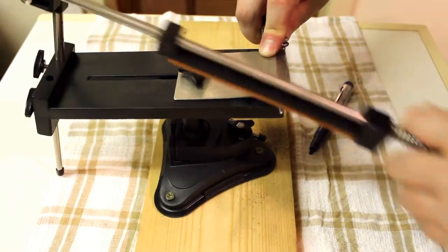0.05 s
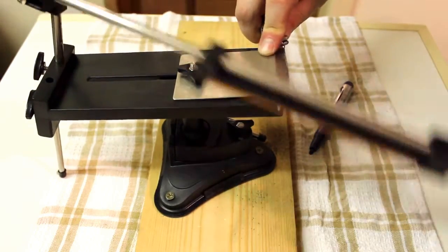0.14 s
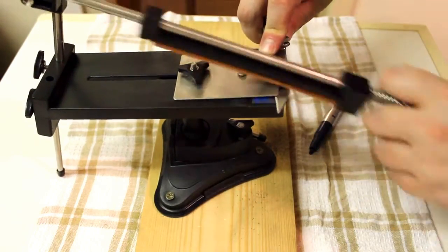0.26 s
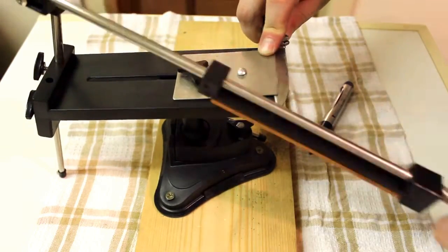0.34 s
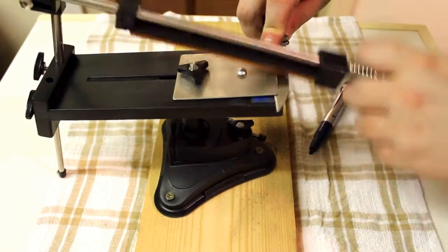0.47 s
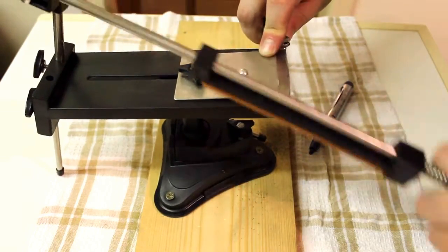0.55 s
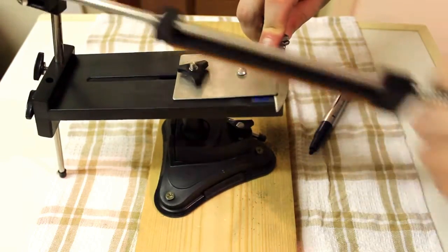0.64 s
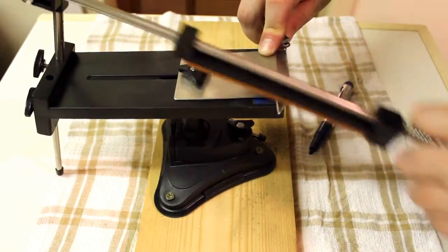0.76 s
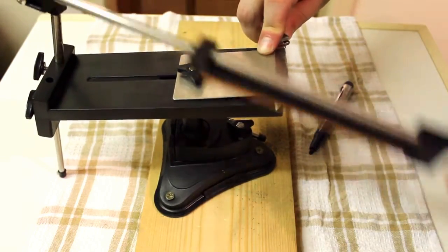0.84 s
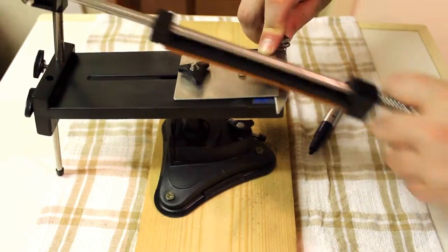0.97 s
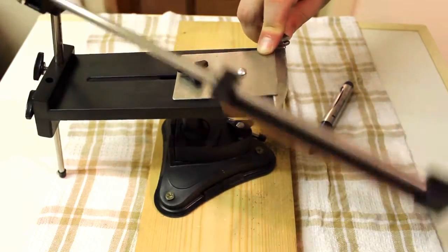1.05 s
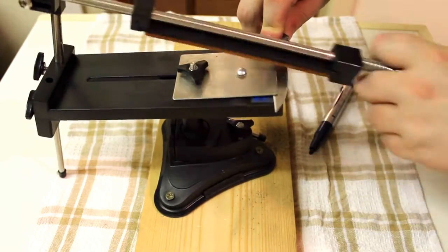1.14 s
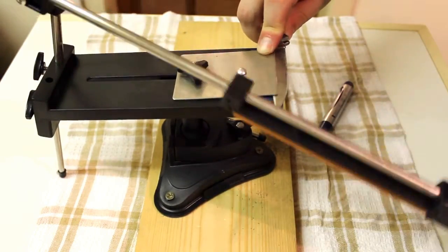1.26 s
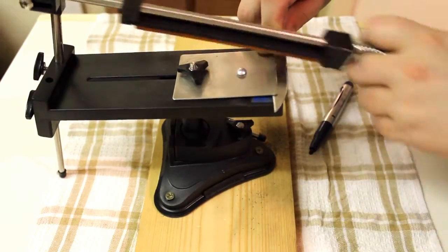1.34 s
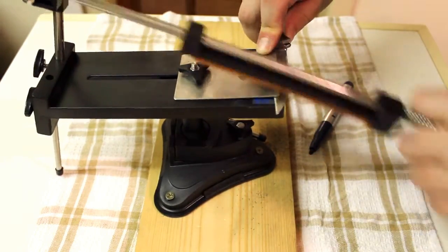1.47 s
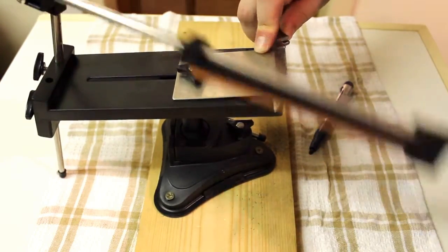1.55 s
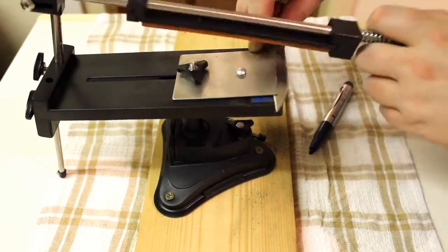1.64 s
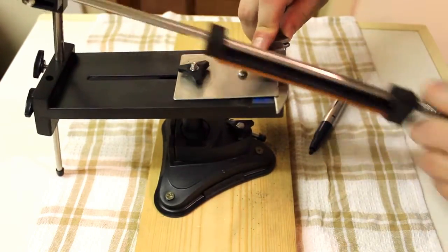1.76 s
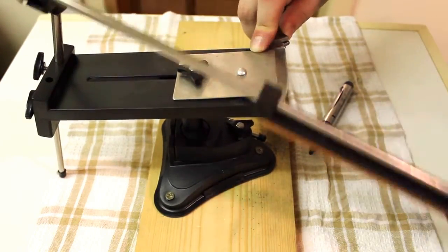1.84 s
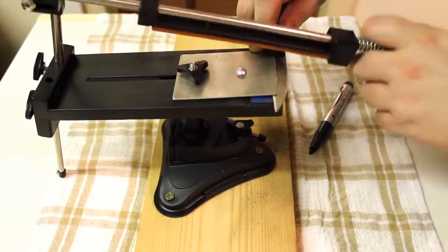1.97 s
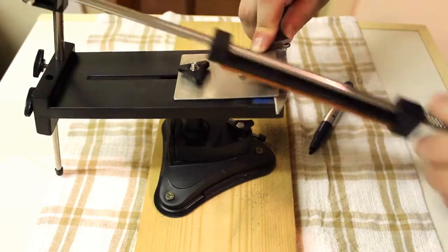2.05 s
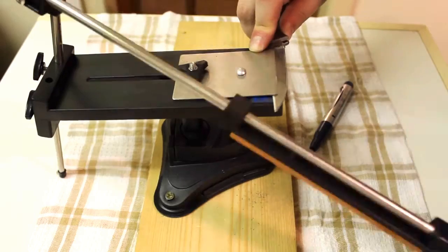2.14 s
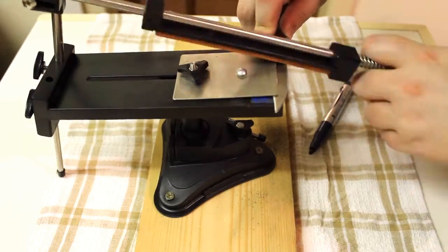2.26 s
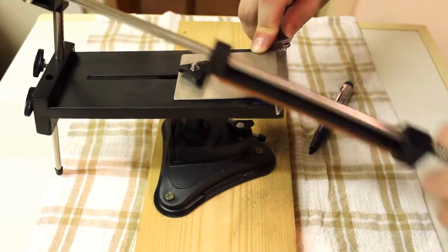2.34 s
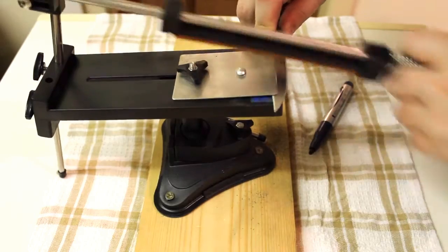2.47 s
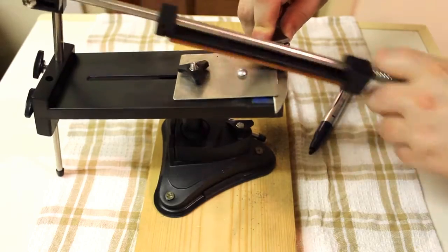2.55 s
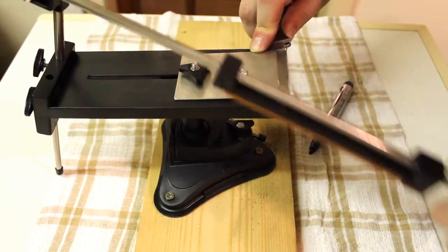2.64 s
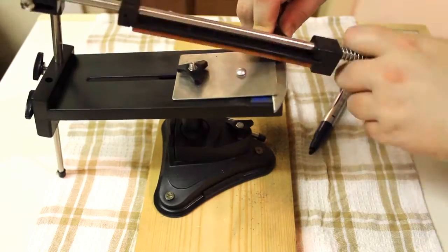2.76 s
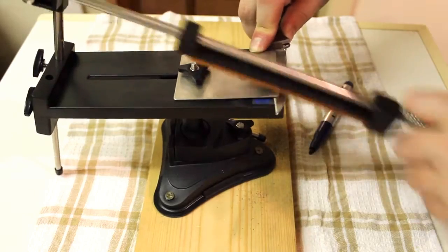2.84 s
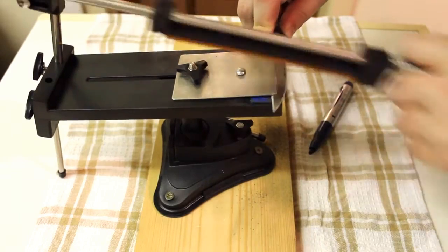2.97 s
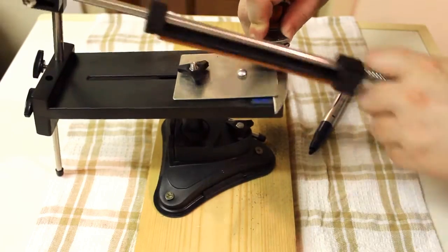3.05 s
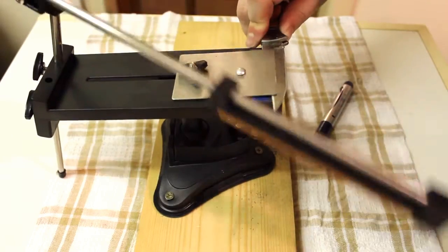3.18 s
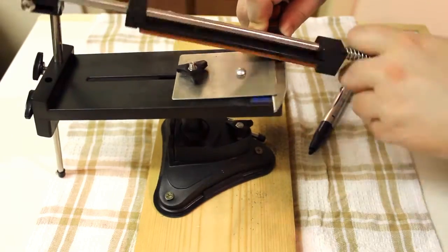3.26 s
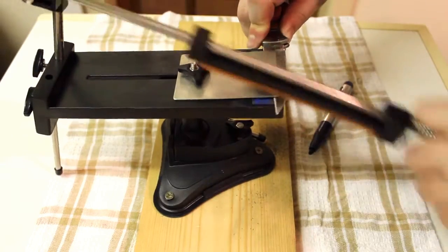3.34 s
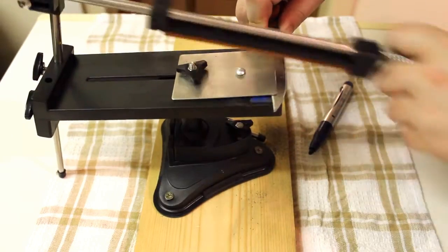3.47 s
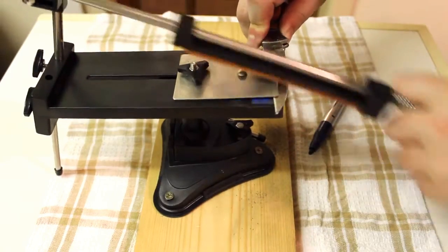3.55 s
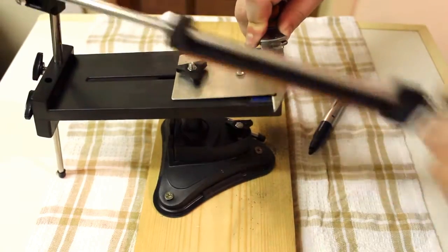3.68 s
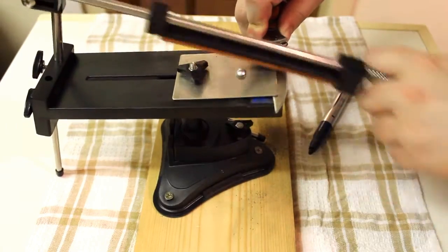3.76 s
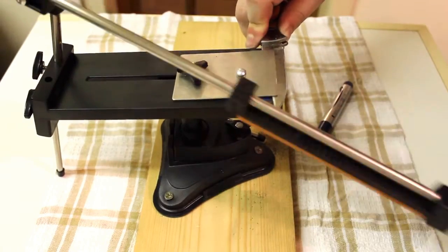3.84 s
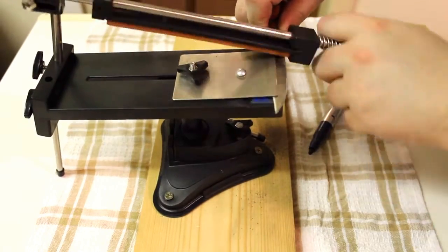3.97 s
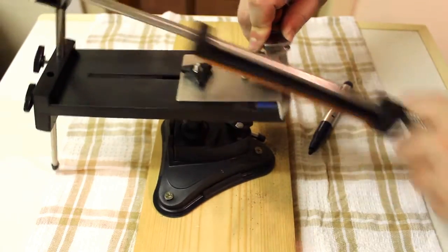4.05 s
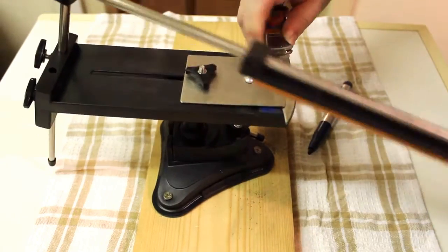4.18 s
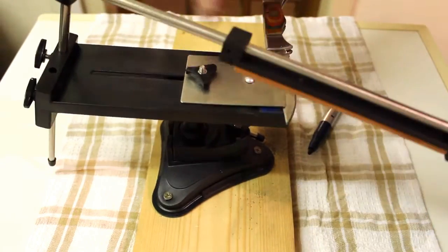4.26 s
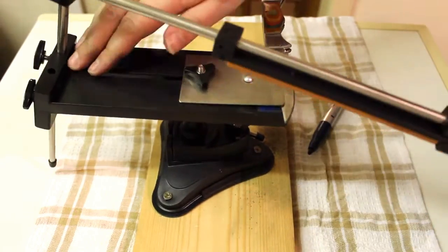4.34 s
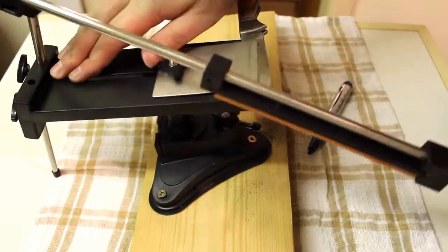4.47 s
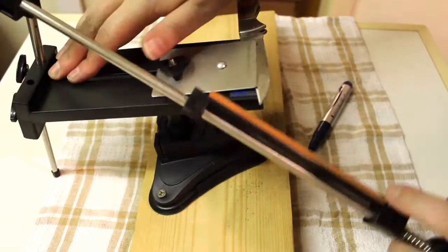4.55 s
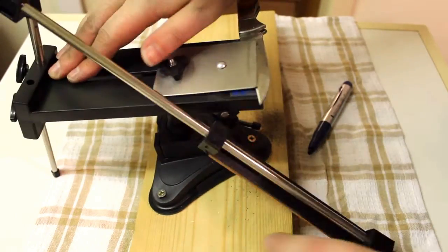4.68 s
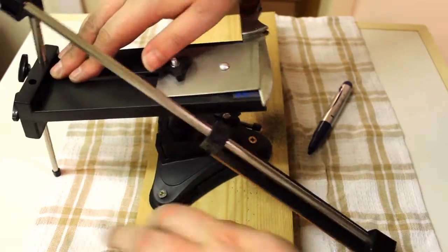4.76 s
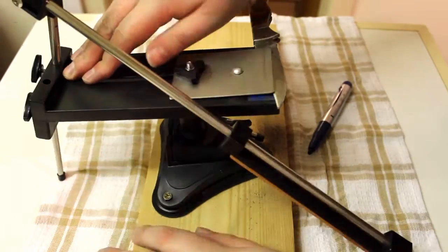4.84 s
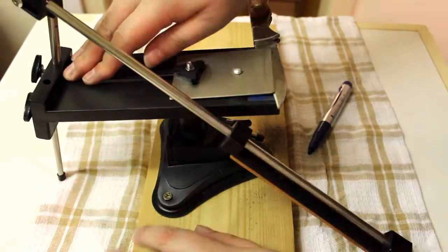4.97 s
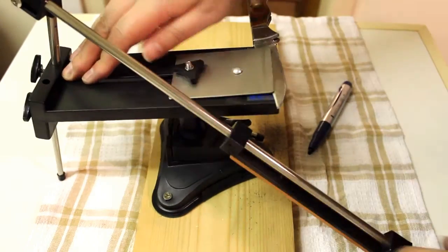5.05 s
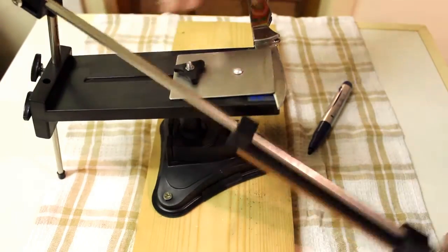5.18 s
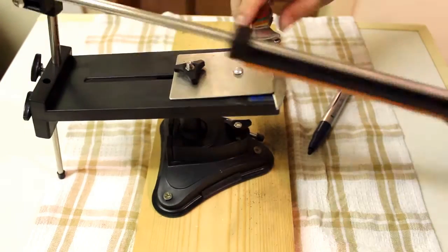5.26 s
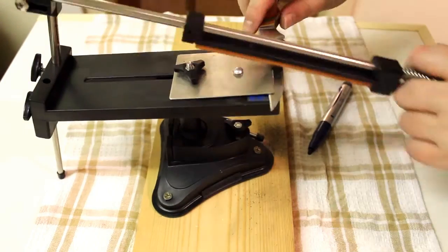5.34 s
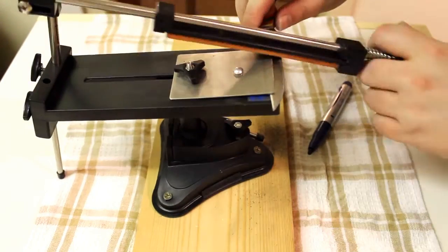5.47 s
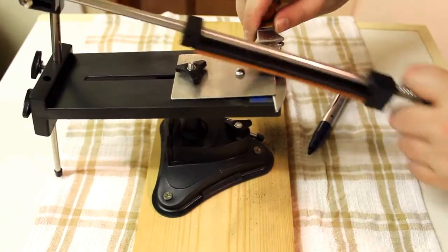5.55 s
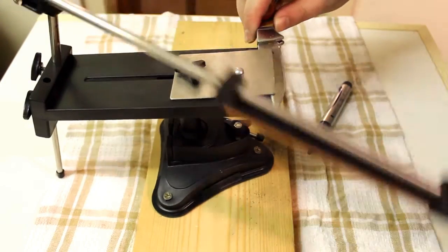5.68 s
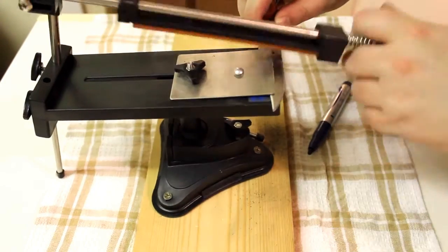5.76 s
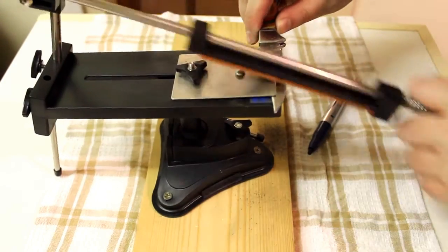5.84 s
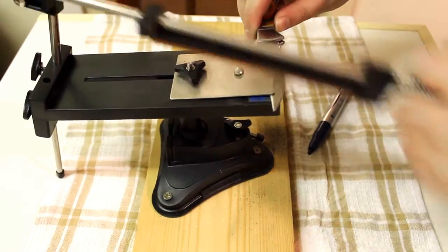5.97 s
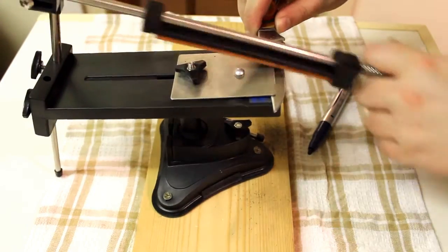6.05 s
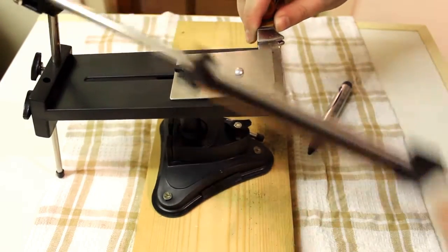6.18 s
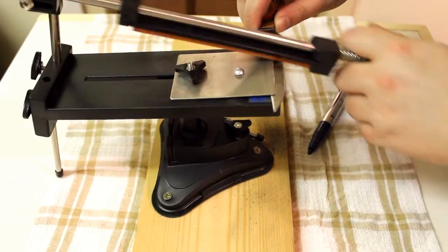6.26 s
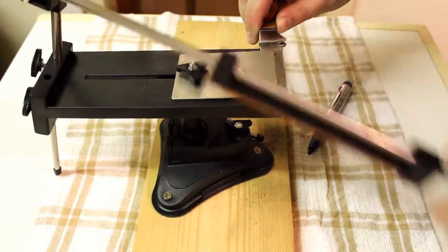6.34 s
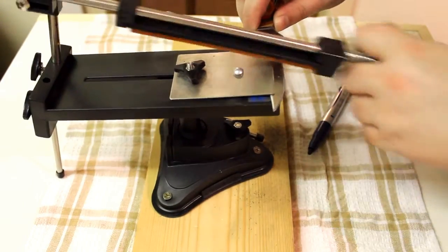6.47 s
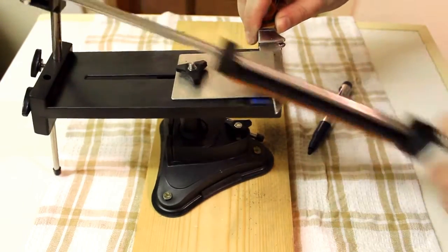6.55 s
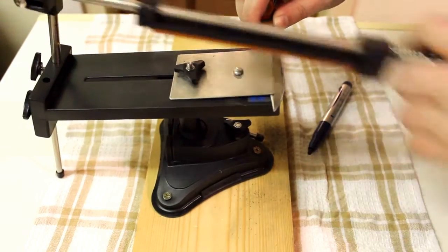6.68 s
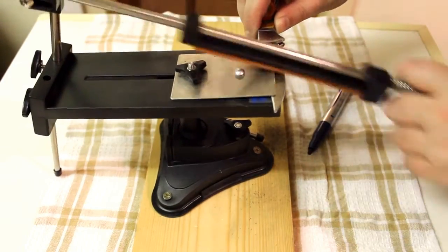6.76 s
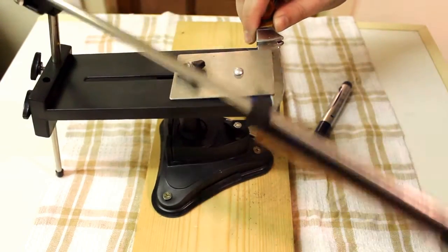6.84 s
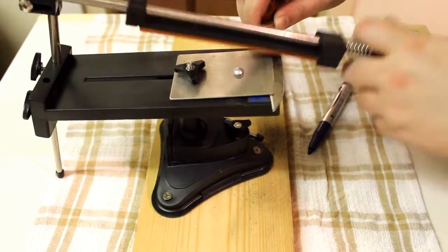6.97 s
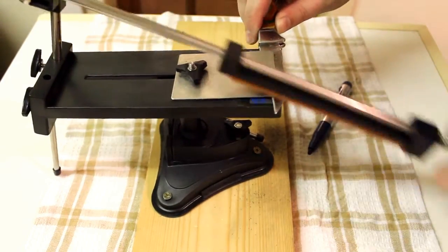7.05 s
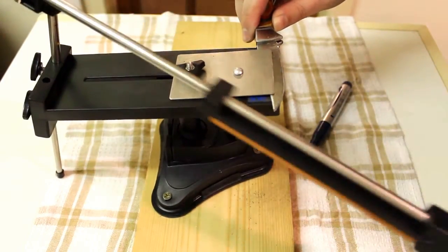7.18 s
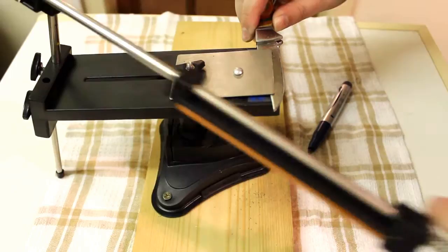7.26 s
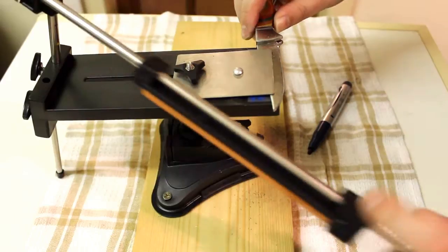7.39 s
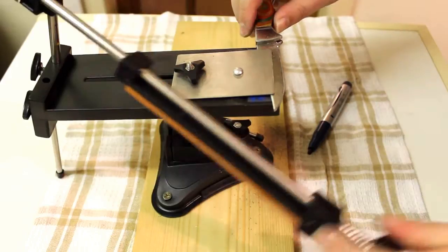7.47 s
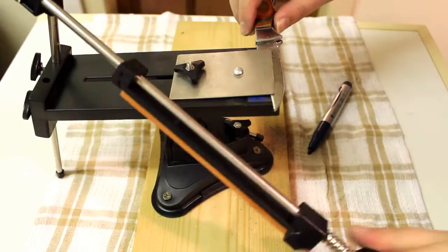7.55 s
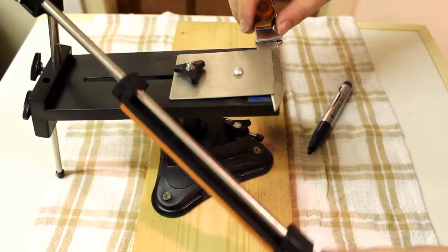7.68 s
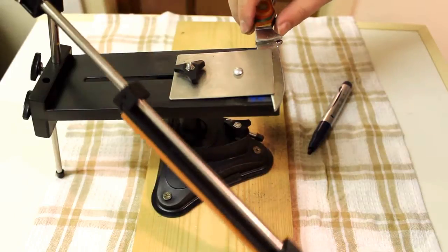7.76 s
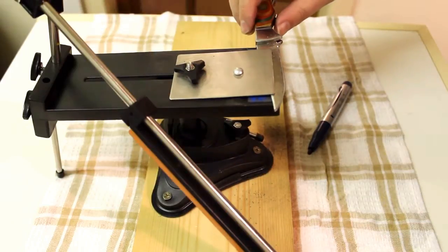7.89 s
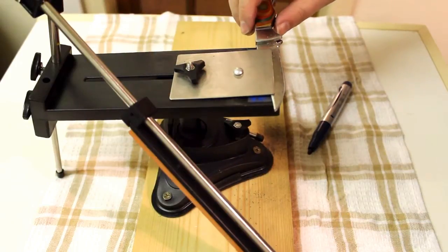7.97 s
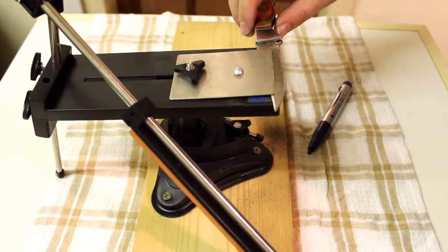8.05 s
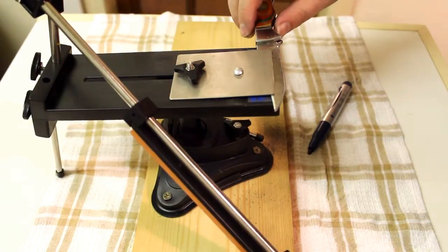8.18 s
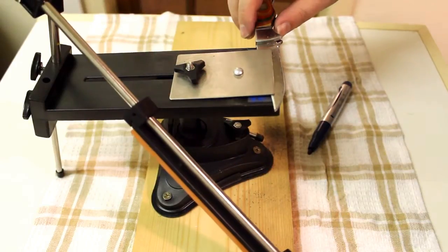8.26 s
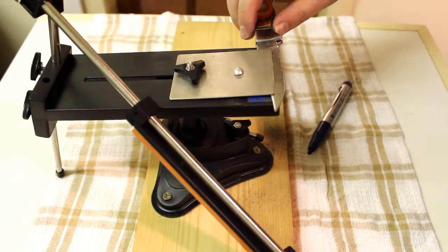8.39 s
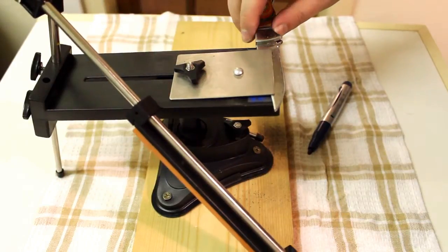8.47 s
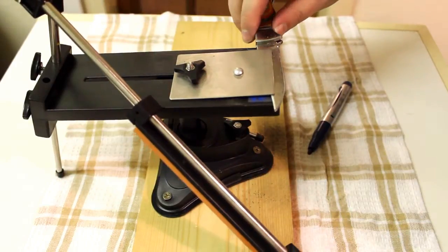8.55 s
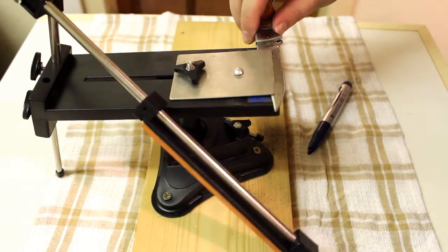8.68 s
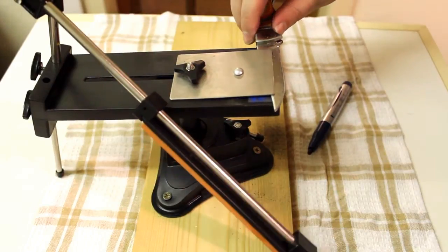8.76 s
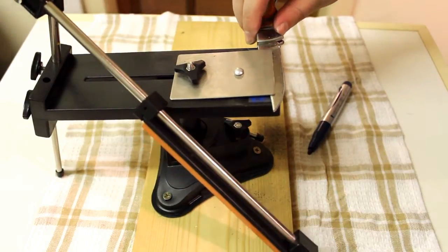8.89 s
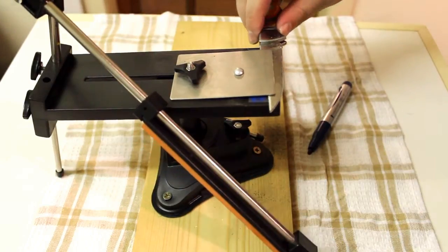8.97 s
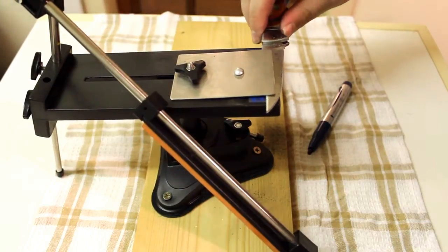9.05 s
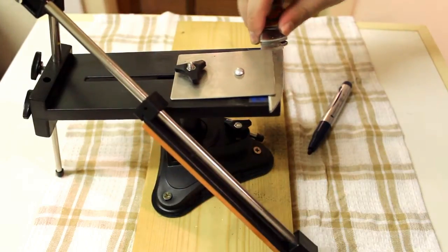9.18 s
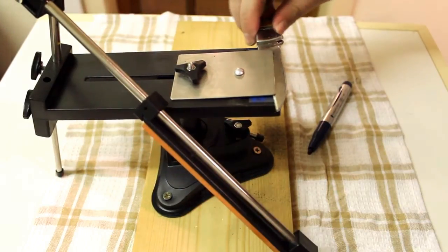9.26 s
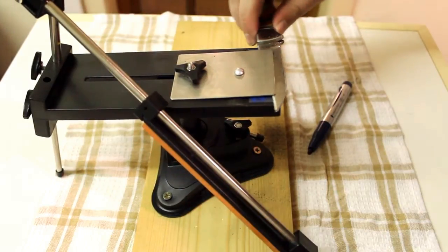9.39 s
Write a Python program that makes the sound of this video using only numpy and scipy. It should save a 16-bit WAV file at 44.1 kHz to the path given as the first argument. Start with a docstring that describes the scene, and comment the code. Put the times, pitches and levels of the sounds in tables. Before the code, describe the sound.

Fast, gritty stone scraping on a knife edge with sharp metallic clacks at each turn, then a sliding rod and small bumps over faint hum.

```python
"""Knife sharpening on a guided rod

A coarse stone scrapes along a clamped knife (grain noise under stroke envelopes) in a small room with a faint hum.
The loose holder knocks on its rod at each turn (coloured bursts, ringing modes); once the arm is laid down with a
clunk. Time runs four times fast for seven seconds, so all is high and quick; then, at natural speed, the rod
slides out in a fading rub and small things bump, rustle, tap and tick."""
import sys
import numpy as np
from scipy import signal
from scipy.fft import rfft, irfft
from scipy.io import wavfile

SR = 44100
rng = np.random.default_rng(int(sys.argv[2]) if len(sys.argv) > 2 else 0)


def to_wav(sig):
    """Store sig (one row per channel, or 1-D mono) as 16-bit WAV at the path in sys.argv[1].

    Samples outside -1..1 are clipped; the rate is SR.
    """
    pcm = np.clip(np.atleast_2d(sig), -1, 1) * 32767
    pcm = np.round(pcm).astype(np.int16)
    wavfile.write(sys.argv[1], SR, pcm.T)  # frames by channels


N = 415418
TIME_S = np.arange(N) / SR

# pushes, re a usual push: t/s, pressure/dB, clack/dB, clink/dB, clack-to-clink delay/s, bite/dB
PUSHES = [(0.0812, 1.5, 3, -1.5, 0.0044, -1), (0.3233, -6.5, 5, -9, 0.0022, -10),
          (.555, -11, 1.5, -5, 0.0045, -10), (0.7893, -9, 4, -9, 0.0043, -3),
          (1.0068, -6, 3.5, -6, 0.0038, -4.5), (1.2354, 1, 3.5, -2, 0.0039, 1.5),
          (1.471, -2, 0.5, 1.5, 0.00081, -4), (1.7582, -6.5, 1, -1.5, 0.0049, -8),
          (2.0731, -6.5, 1, 3, 0.001, -3), (2.3308, -0.5, -0.5, 1, 0.0049, -15),
          (2.584, -6.5, -7, -1, 0.00057, -3), (2.8512, -2.5, -1, -1, 0.0052, -1.5),
          (3.0912, -8, 0, -1, 0.004, -7), (3.3393, -6, 0.5, -1.5, 0.0049, -5),
          (3.5818, 0, 0.5, 0, 0.0043, -1), (3.818, 1, 1, -1, 0.0032, -2),
          (4.049, -0.5, -2.5, -7, 0.018, -3), (5.576, -21, -9.5, -8.5, 0.0069, -7.5),
          (5.87, -19, 0, 2, 0.0034, -1), (6.1067, -10, 1.5, 0, 0.0045, -5),
          (6.3325, -7, -3, -2.5, 0.0067, -5), (6.555, -0.5, -1, -12, 0.0019, 1.5),
          (6.8121, -10, -0.5, 0.5, 0.0064, -10), (7.0582, -7.5, -1.5, 0.5, 0.0045, 1)]
# pulls back, re a usual pull: t/s, pressure/dB, clack/dB, clink/dB, clack-to-clink delay/s
PULLS = [(0.1857, -2, -7, 0, 0.001), (0.429, 6, -5.5, -5, 0.0016), (0.6677, -1, -5, 0.5, 0.00092),
         (0.8946, -9, -6, 0.5, 0.001), (1.114, 1, 9, 1, 0.0021), (1.3381, 2, -14, 0, 0.0012),
         (1.5938, 3, 1.5, -0.5, 0.003), (1.9343, 5, -8, 1, 0.0014), (2.2041, 1, 2.5, 1.5, 0.00092),
         (2.4669, -6, 3.5, -0.5, 0.0038), (2.74, 2, -6, 1, 0.00091), (2.9785, 0, 2, -3.5, 0.0011),
         (3.2348, -14, -4.5, -0.5, 0.00073), (3.467, 2, -12, -3, .001), (3.701, 3, 0, 5, 0.0019),
         (3.93, 7, 0, -4.5, 0.00087), (4.1696, -24, 0, 2, 0.00091), (5.471, -7, -5.5, -6.5, 0.011),
         (5.7361, 7, 1, 0, 0.0022), (5.9879, 4, -17, 1, .001), (6.226, 2, 1.5, -2.5, 0.002),
         (6.4496, 13, -1, -6.5, 0.0016), (6.679, 9, -30, -1.5, 0.00095), (6.9331, 2, -5.5, 1, 0.00088),
         (7.1859, -11, -4.5, 3.5, 0.0014)]
# modes of rod, holder and blade: f/Hz, relative level/dB, t60/s
ROD = [(715, -11, .04), (915, -8, .04), (1050, -5, .022), (1310, -9, .028), (1500, -12, .025),
       (2130, -9, .02), (2800, -5, .015), (3030, -3, .016), (3460, 2.5, .016), (4020, -1.5, .014),
       (4700, -3, .014), (5080, -2, .016), (8690, 0, .01), (10850, -4, .01)]
# modes of the holder's spring: f/Hz, relative level/dB, t60/s
SPRING = [(2050, 0, .15), (2770, -1, .06), (3480, 0, .06), (5850, -2, .05)]


def amp(db):
    """Amplitude ratio of a level in dB."""
    return 10 ** (np.asarray(db) / 20)


def unit_rms(x):
    """Scales to an RMS of one."""
    return x / np.sqrt(np.mean(x ** 2) + 1e-20)


def unit_energy(x):
    """Scales to an energy of one."""
    return x / np.sqrt(np.sum(x ** 2) + 1e-20)


def add(mix, start_s, sound):
    """Adds a sound in place, cut at the end of the mix."""
    part = mix[round(start_s * SR):][:len(sound)]
    part += sound[:len(part)]


def convolve(x, response):
    """Causal filtering without the tail."""
    return signal.oaconvolve(x, response)[:len(x)]


def read_curve(points, hz):
    """Interpolates a curve over log frequency."""
    f, value = np.transpose(points)
    return np.interp(np.log(hz + 1), np.log(f + 1), value)


def three_bands(hz):
    """Gains of a low, a middle and a high band whose powers sum to one."""
    low = 1 / (1 + (hz / 2200) ** 10)
    high = 1 - 1 / (1 + (hz / 6400) ** 10)
    return np.sqrt([low, abs(1 - low - high), high])


def colour(points, band=None, size=2048):
    """Minimum-phase, unit-energy response with the given spectrum, or with one band of it."""
    hz = np.fft.rfftfreq(size, 1 / SR)
    gain = amp(read_curve(points, hz))
    if band is not None:
        gain = gain * three_bands(hz)[band]
    cepstrum = irfft(np.log(gain + 1e-4 * gain.max()))
    # folding the cepstrum makes the response causal
    cepstrum[1:size // 2] *= 2
    cepstrum[size // 2 + 1:] = 0
    return unit_energy(irfft(np.exp(rfft(cepstrum)))[:size // 2])


def drift(rate_hz):
    """Slow unit-RMS noise under a Gaussian low-pass."""
    hz = np.fft.rfftfreq(N, 1 / SR)
    spectrum = rfft(rng.standard_normal(N)) * np.exp(-(hz / rate_hz) ** 2)
    return unit_rms(irfft(spectrum, N))


def ring(modes, size=11025):
    """Dying sines of a struck part, which radiates little bass."""
    t = np.arange(size) / SR
    sines = np.zeros(size)
    for hz, db, t60_s in modes:
        sines += amp(db - 60 * t / t60_s) * np.sin(2 * np.pi * hz * t)
    high_pass = signal.butter(2, 300, "high", fs=SR, output="sos")
    return unit_energy(signal.sosfilt(high_pass, sines))


def ringing(x, modes, ring_db):
    """A sound together with the ring that it wakes in a part."""
    return x + amp(ring_db) * convolve(x, ring(modes))


def blow(response, db, decay_s):
    """A brief grinding contact, differently coloured each time; db is its level over three milliseconds."""
    u = np.arange(SR // 50) / SR / decay_s
    burst = rng.standard_normal(len(u)) * np.sqrt(u) * np.exp(-u)
    # partly flattened spectrum; the 12-sample lead leaves room for its smear
    spectrum = rfft(np.roll(burst, 12))
    crunch = irfft(spectrum / abs(spectrum) ** .75)[:len(u) // 2]
    return amp(db) * np.sqrt(.003 * SR) * unit_energy(signal.fftconvolve(crunch, response))


def hits(table, spectrum, decay_s):
    """A row of like contacts (t/s, level/dB), each a coloured noise burst."""
    out, response = np.zeros(N), colour(spectrum)
    for s, db in table:
        add(out, s, blow(response, db, decay_s))
    return out


def room(x, t60_s, build_up_s, shift_hz=(1.9, 3.1)):
    """Dense reflections that build up and die away; their pattern shifts steadily."""
    t = np.arange(SR // 2) / SR
    fade = amp(-60 * t / t60_s) * (1 - np.exp(-(t / build_up_s) ** 2))
    a, b = 2 * np.pi * np.outer(shift_hz, TIME_S)
    # the squares of the three shares sum to one
    shares = np.cos(a), np.sin(a) * np.cos(b), np.sin(a) * np.sin(b)
    out = np.zeros(N)
    for share in shares:
        out += convolve(x * share, unit_energy(rng.standard_normal(len(t)) * fade))
    return out


def air(spectrum):
    """Steady room noise: coloured white noise."""
    return convolve(rng.standard_normal(N), colour(spectrum, size=8192))


def hum(speed, waver_cycles=0.0049):
    """A distant motor: close sine lines beat and waver together; speed multiplies their pitch."""
    # at natural speed: f/Hz, relative level/dB
    lines = [(47.5, -22), (100.1, -25), (141.3, -18), (147.2, 0), (153.15, -11), (300, -23)]
    lag_s = waver_cycles / 147 * drift(speed)  # RMS waver in cycles holds at 147 Hz
    out = np.zeros(N)
    for hz, db in lines:
        cycles = hz * (speed * TIME_S + lag_s) + rng.random()
        out += amp(db) * np.sin(2 * np.pi * cycles)
    return np.sqrt(2) * out


def grit(grains_per_s=4400, grain_db=3.5):
    """Dense tiny fractures of the stone, of uneven size: random sparse impulses."""
    size = amp(grain_db * np.minimum(rng.exponential(1, N), 4))
    broken = rng.random(N) < grains_per_s / SR
    return unit_rms(size * rng.standard_normal(N) * broken)


def stroke_length(start_s, longest_s=0.135):
    """A stroke lasts until the next turn, at most longest_s."""
    return min([longest_s] + [row[0] - start_s for row in PUSHES + PULLS if row[0] > start_s])


def swing(length_s, peak, drag):
    """Rub over one stroke: steady drag under an arch of speed that tops at the given share of the length."""
    travel = np.arange(0, length_s, 1 / SR) / length_s
    bend = np.log(.5) / np.log(np.clip(peak, .1, .95))
    arch = np.sin(np.pi * travel ** bend)
    return drag + (1 - drag) * arch


def scrape(chatter_db=3.0):
    """Grit breaks along the edge; a push gathers speed and peaks late, the light pull back peaks sooner."""
    # light passes without a knock: t/s, length/s, pressure/dB re a usual pull
    brushes = [(0.0, 0.068, 19), (4.494, 0.049, 14), (5.331, 0.057, 9)]
    # scrape spectrum: f/Hz, gain/dB
    spectrum = [(80, -25), (160, -10), (235, 5.5), (340, -12.5), (480, 8), (750, -5), (1000, 1.5),
                (1700, -10.5), (2400, -15.5), (3000, -13.5), (4200, -5), (6000, -12.5), (8000, -5.5),
                (9500, -2.5), (10900, 2.5), (13000, 0.5), (13800, 4), (15100, -0.5), (16000, 5.5)]
    # bands: low rub, middle rasp, high grit
    push_db, pull_db = (-44, -46.5, -38.5), (-55, -62, -49)
    db_per_pressure_db, drag = (0.36, 0.4, 0.14), (0.38, 0.49, 0.44)
    push_peak, pull_peak = (0.81, 0.87, 0.9), 0.6  # shares of the stroke
    growth_db_per_s, midway_s = (0.14, 1, 0), 3.5
    light = [(s, stroke_length(s), pressure) for s, pressure, *_ in PULLS] + brushes
    out = np.zeros(N)
    for band in range(3):
        drive, law = np.zeros(N), db_per_pressure_db[band]
        for s, pressure, *_ in PUSHES:
            arch = swing(stroke_length(s), push_peak[band], drag[band])
            add(drive, s, amp(push_db[band] + law * pressure) * arch)
        for s, length_s, pressure in light:
            arch = swing(length_s, pull_peak, drag[band])
            add(drive, s, amp(pull_db[band] + law * pressure) * arch)
        growth_db = growth_db_per_s[band] * (TIME_S - midway_s)
        drive *= amp(growth_db + chatter_db * drift(69))
        out += convolve(grit() * drive, colour(spectrum, band))
    return out


def resonate(x, hz, width_hz):
    """A steep resonance that follows the curve hz: two equal poles in a turning frame."""
    turn = np.exp(2j * np.pi * np.cumsum(hz) / SR)
    r = np.exp(-np.pi * width_hz * 1.55 / SR)  # 1.55 offsets the narrowing by the second pole
    return 2 * (turn * signal.lfilter([(1 - r) ** 2], [1, -2 * r, r * r], x / turn)).real


def bite(glide=0.11, detune=0.02, clump_db=1.5):
    """At speed, coarse grains catch the edge in clumps; the blade's resonances glide as the contact travels."""
    # blade resonances: f/Hz, width/Hz, gain/dB
    blade = [(1060, 890, -9), (1560, 380, 4), (3600, 1300, -2)]
    usual_db, peak = -46, 0.77  # level at the strongest, and its share of the push
    grains = grit(grains_per_s=2500, grain_db=4.5) * unit_rms(amp(clump_db * drift(70)))
    out = np.zeros(N)
    for s, *_, bite_db in PUSHES:
        speed = swing(stroke_length(s), peak, 0)
        shift = 1 + glide * (np.linspace(0, 1, len(speed)) - peak)
        drive = grains[round(s * SR):][:len(speed)]
        rasp = np.zeros(len(drive))
        for hz, width_hz, db in blade:
            curve_hz = hz * shift * (1 + detune * rng.standard_normal())
            rasp += amp(db) * resonate(drive, curve_hz, width_hz)
        add(out, s, amp(usual_db + bite_db) * speed ** 2 * unit_rms(rasp))
    return out


def holder_contacts():
    """Rows (t/s, relative dB, usual band dB): every turn is a clack and, on the rebound, a clink."""
    # knocks between turns: t/s, clack/dB re a usual pull clack, clink/dB re a usual push clink
    between = [(0.0958, -18, -2.5), (1.461, -13, -10), (2.057, -21, -4), (3.107, -5, -21),
               (3.3572, -6.5, -5), (4.076, -10, -11), (4.6238, -4, -9), (4.6875, -3, -1),
               (4.8705, 5.5, 4.5), (4.8742, -1.5, -3.5)]
    # low, middle, high
    push_clack_db, push_clink_db = (-32.5, -29.5, -28.5), (-34.5, -42, -19.5)
    pull_clack_db, pull_clink_db = (-37, -31.5, -35.5), (-35.5, -41.5, -22)
    kinds = (PUSHES, push_clack_db, push_clink_db), (PULLS, pull_clack_db, pull_clink_db)
    rows = []
    for strokes, usual_clack, usual_clink in kinds:
        for s, _, clack_db, clink_db, rebound_s, *_ in strokes:
            rows += [(s, clack_db, usual_clack), (s + rebound_s, clink_db, usual_clink)]
    for s, clack_db, clink_db in between:
        rows += [(s, clack_db, pull_clack_db), (s, clink_db, push_clink_db)]
    return rows


def rod_modes(spread_db=8.0, detune=.006):
    """Each contact lands elsewhere and so weights and tunes the rod's modes a little differently."""
    hz, db, t60_s = np.transpose(ROD)
    pitch_chance, level_chance = rng.standard_normal((2, len(ROD)))
    return zip(hz * (1 + detune * pitch_chance), db + spread_db * level_chance, t60_s)


def knocks(ring_db=-16.0):
    """The holder takes up its play at each turn; the rod rings and the jig rattles briefly, least in the treble."""
    # knock spectrum: f/Hz, gain/dB
    spectrum = [(100, -21), (235, -3.5), (340, -10.5), (550, 4.5), (800, -3), (1400, -1.5), (1800, -9.5),
                (2350, -12.5), (3000, -3), (4000, 1), (5300, -9), (7800, -7.5), (9600, -4), (11200, -1.5),
                (15100, -4), (16000, -3.5)]
    decay_s, jig_db = (.00045, .0005, .00054), (-9, -8, -11)  # low, middle, high
    out, rows = np.zeros(N), holder_contacts()
    rings = [ring(rod_modes(), size=1024) for _ in rows]
    for band in range(3):
        contacts, response = np.zeros(N), colour(spectrum, band)
        for (s, db, usual_db), rod in zip(rows, rings):
            with_rod = response + amp(ring_db) * convolve(response, rod)
            add(contacts, s, blow(with_rod, usual_db[band] + db, decay_s[band]))
        out += contacts + amp(jig_db[band]) * room(contacts, t60_s=0.0046, build_up_s=0.0014)
    return out


def specks(per_s=16, db=-36):
    """Thin, dry one-sample clicks: a few clear ones among faint, scattered ones."""
    # clear clicks: t/s, sample level/dB
    clicks = [(0.223, -18), (.4725, -18), (.598, -10), (1.516, -14), (1.64, -15), (1.808, -21),
              (2.817, -16), (3.139, -16), (3.317, -16), (3.9737, -13.5), (4.651, -19), (6.6497, -9.5),
              (6.776, -18)]
    out = amp(db) * rng.standard_normal(N) * (rng.random(N) < per_s / SR)
    for s, peak_db in clicks:
        add(out, s, amp([peak_db]))
    return out


def squeaks():
    """Small squeaks of the holder's spring on the way back: narrowly coloured bursts."""
    # squeaks: t/s, level/dB
    events = [(.941, -40), (1.63, -41), (1.99, -40), (2.258, -39.5), (2.519, -39.5), (2.8, -41),
              (3.031, -39.5), (3.525, -42), (5.246, -38), (5.268, -39.5), (5.792, -42), (6.04, -43),
              (6.273, -41), (6.727, -40.5), (6.978, -36)]
    # squeak spectrum: f/Hz, gain/dB
    spectrum = [(2000, -13.5), (3000, -6), (3700, -11), (5400, -8), (6100, 1.5), (6700, -19), (7500, -13.5)]
    return hits(events, spectrum, decay_s=0.0038)


def flurry(start_s, length_s, per_s, first_db, fall_db_per_s, spread_db=3.0):
    """Rows (t/s, level/dB) of small contacts at uneven intervals that tend to grow fainter."""
    when, strength = rng.random(size=(64, 2)).T
    age_s = (np.arange(len(when)) + when) / per_s
    db = first_db - fall_db_per_s * age_s + spread_db * (2 * strength - 1)
    return list(zip(start_s + age_s[age_s < length_s], db))


def clunk(crack_db=1, clatter_db=-10, base_ring_db=10):
    """The holder jiggles, then the arm drops on the base: hard crack, ringing metal, dense rattle of loose parts."""
    # holder jiggles as the arm is lowered: t/s, level/dB
    jiggles = [(4.5705, -33.5), (4.577, -44), (4.583, -39), (4.6125, -39), (4.6158, -24), (4.6205, -31),
               (4.6275, -36), (4.663, -28)]
    # arm lands and bounces: t/s, relative level/dB
    landings = [(4.6835, -9.5), (4.6872, -19), (4.697, -37)]
    # clearest rebounds of loose parts: t/s, level/dB
    rebounds = [(4.7225, -33), (4.745, -34.5), (4.766, -43)]
    # modes of clamp and base: f/Hz, relative level/dB, t60/s
    base = [(915, 2, .19), (1071, 3, .07), (1270, 1, .08), (1495, -4, .08), (1622, -6, .14), (1771, -1, .1),
            (2150, -3, .08), (2650, 2, .07), (3273, -3, .08), (3390, -4, .12), (3860, -3, .13),
            (3985, -1, .09), (4170, -3, .09), (4815, -10, .15)]
    # spectra: f/Hz, gain/dB
    jiggle_spectrum = [(100, -22), (600, -3), (1400, 1), (1750, -4), (2100, -13), (2900, -11), (3600, 2),
                       (4200, -8), (6500, -16), (15500, -16)]
    crack_spectrum = [(70, -48), (260, -12), (420, -13), (600, -4), (780, -4), (950, 9), (1150, 9.5),
                      (1500, 4), (2100, -5), (2680, 2), (3100, -2), (4000, -1), (5500, -9), (7000, -19),
                      (15500, -22)]
    rattle_spectrum = [(400, -18), (1000, -1), (2000, -3), (3000, -3), (4100, 0), (5500, -4), (8000, -10),
                       (9500, -17), (15000, -20)]
    contacts = amp(crack_db) * hits(landings, crack_spectrum, decay_s=0.00011)
    contacts += hits(jiggles, jiggle_spectrum, decay_s=0.0011)
    out = contacts + amp(clatter_db) * room(contacts, t60_s=0.0078, build_up_s=0.00025)
    metal = ring(base)
    for s, db in landings:
        add(out, s, amp(db + base_ring_db) * metal)
    rattle = flurry(4.686, length_s=.105, per_s=600, first_db=-30.5, fall_db_per_s=235)
    return out + hits(rebounds + rattle, rattle_spectrum, decay_s=0.00022)


def slide(width_hz=900, unevenness_db=1.5, spring_db=-21):
    """The rod runs out through its pivot: a jolt, a rub that fades and wakes the spring, and a gliding hiss."""
    # hiss: t/s, pitch/Hz, level/dB
    hiss_curve = [(7.362, 7000, -50.5), (7.45, 6500, -51.5), (7.6, 6800, -68), (7.802, 6930, -64)]
    # rub spectrum: f/Hz, gain/dB
    spectrum = [(500, -3.5), (1650, -6.5), (2000, -2.5), (2250, -4), (2750, 3.5), (4000, 0.5), (5500, 1),
                (7400, -4.5), (8800, -15), (14000, -43)]
    start_s, end_s = 7.151, 7.8
    jolt_db, jolt_fall_db_per_s, rub_db, rub_fall_db_per_s = -36, 449, -39, 40
    age_s = np.arange(0, end_s - start_s, 1 / SR)
    jolt = amp(jolt_db - jolt_fall_db_per_s * age_s)
    level = np.zeros(N)
    add(level, start_s, jolt + amp(rub_db - rub_fall_db_per_s * age_s))
    rub = convolve(rng.standard_normal(N), colour(spectrum)) * level
    rub = ringing(rub, SPRING, spring_db)
    s, hz, db = np.transpose(hiss_curve)
    carrier = np.cos(2 * np.pi * np.cumsum(np.interp(TIME_S, s, hz)) / SR)
    hiss = unit_rms(drift(width_hz) * carrier)
    hiss *= np.interp(TIME_S, s, amp(db), left=0, right=0)
    return amp(unevenness_db * drift(83)) * (rub + hiss)


def handling(table_db=-27, spring_db=-20):
    """The jig bumps on the table, fingers rustle along the spring and small metal parts tap and tick."""
    # dull bumps on the table; a finger tap on the jig; finger rustles; light metal ticks: t/s, level/dB
    bump_events = [(7.485, -39), (8.756, -30), (8.94, -41)]
    tap_events = [(8.847, -35.5)]
    rustle_events = [(8.981, -43), (8.989, -40.5), (9.011, -41), (9.037, -42), (9.046, -43), (9.083, -48)]
    tick_events = [(9.1205, -34), (9.1285, -41), (9.218, -43), (9.354, -51), (9.3745, -46.5), (9.4, -49)]
    # spectra: f/Hz, gain/dB
    bump_spectrum = [(100, 2), (380, 0), (550, -14.5), (950, 4), (1250, -6), (1800, -24), (2800, -17),
                     (4000, -25), (14000, -47)]
    tap_spectrum = [(160, 7.5), (400, -4), (1450, -2), (2900, -13), (5000, -16), (14000, -34)]
    rustle_spectrum = [(900, -7), (1750, -15), (2050, 0), (2500, -7), (3500, 2), (4300, -3), (7000, 3.5),
                       (9500, -14), (14000, -33)]
    tick_spectrum = [(900, -3), (2700, -14), (4500, -6), (5750, 8), (6600, -3), (7800, 0), (9200, -13),
                     (14000, -34)]
    # modes of the table top: f/Hz, relative level/dB, t60/s
    table_top = [(377, 0, .13), (953, -7, .15)]
    bumps = ringing(hits(bump_events, bump_spectrum, decay_s=0.0029), table_top, table_db)
    taps = hits(tap_events, tap_spectrum, decay_s=0.0018)
    # fainter contacts among the rustles
    fidget = flurry(8.985, length_s=.4, per_s=36.5, first_db=-46.5, fall_db_per_s=33)
    rustles = hits(rustle_events + fidget, rustle_spectrum, decay_s=0.0021)
    ticks = hits(tick_events, tick_spectrum, decay_s=0.0015)
    return bumps + taps + ringing(rustles, SPRING, spring_db) + ticks


def scene():
    """Fast work gives way to natural-speed handling; each has its own room, hum and air."""
    # air spectra, fast and natural: f/Hz, gain/dB
    fast_air = [(30, -19), (100, -4.5), (160, -10), (230, -2), (320, -6.5), (480, 10), (750, 4.5),
                (1050, 3), (1600, -3), (3000, -5.5), (7000, -10.5), (15500, -15.5)]
    slow_air = [(25, -9), (50, -21), (80, -3), (130, 9.5), (280, 3), (400, -1.5), (650, -4), (1500, -9.5),
                (4000, -14.5), (7300, -18.5), (10000, -26.5), (15000, -36.5)]
    fast_air_db, slow_air_db, fast_hum_db, slow_hum_db = -49.5, -50.5, -44, -42.5
    rod_ring_db, room_db = -10, -4.0
    # the two overlap briefly
    fast_gate = np.clip((7.2 - TIME_S) / .01, 0, 1)
    slow_gate = np.clip((TIME_S - 7.149) / .003, 0, 1)

    work = ringing(scrape() + bite(), ROD, rod_ring_db)
    work += knocks() + squeaks() + clunk()
    work = work + amp(room_db) * room(work, t60_s=0.11, build_up_s=0.0003)
    work += specks() + amp(fast_hum_db) * hum(speed=4) + amp(fast_air_db) * air(fast_air)

    after = slide() + handling()
    after = after + amp(room_db) * room(after, t60_s=0.3, build_up_s=0.0013)
    after += amp(slow_hum_db) * hum(speed=1.0) + amp(slow_air_db) * air(slow_air)
    return (fast_gate * work + slow_gate * after)[None]


def record(dry):
    """Full-scale limit, then a linear-phase low-pass."""
    low_pass = signal.firwin(255, 15880, window=("kaiser", 8), fs=SR)  # edge in Hz
    return signal.oaconvolve(np.clip(dry, -1, 1), low_pass[None], "same")


dry = scene()
out = record(dry)
to_wav(out)
```